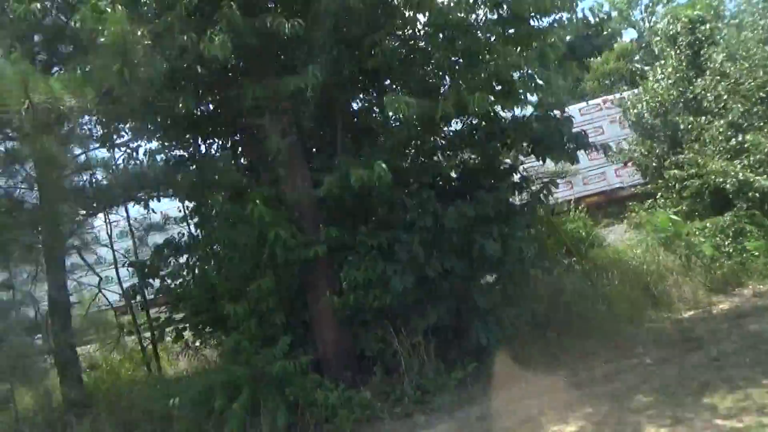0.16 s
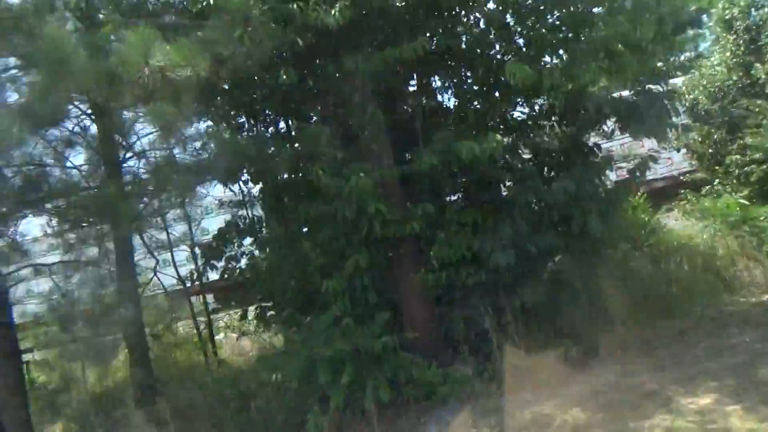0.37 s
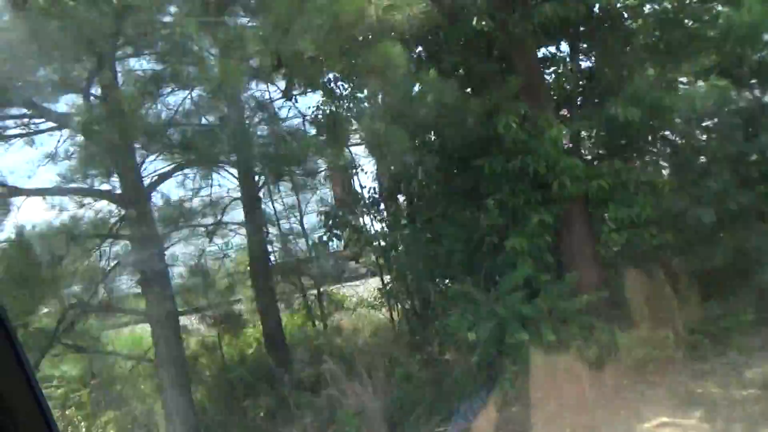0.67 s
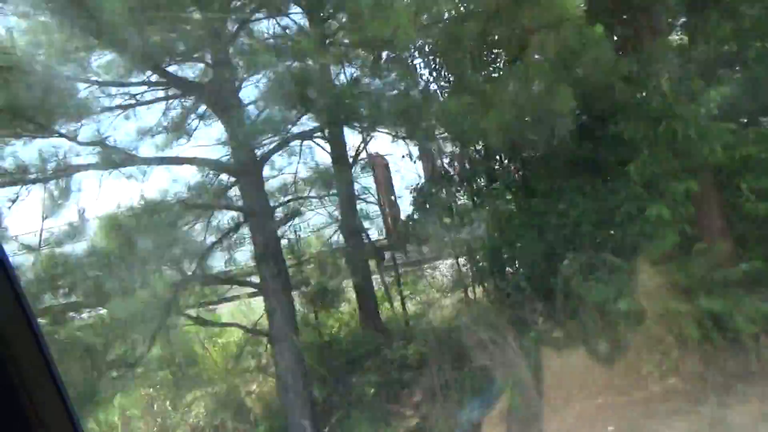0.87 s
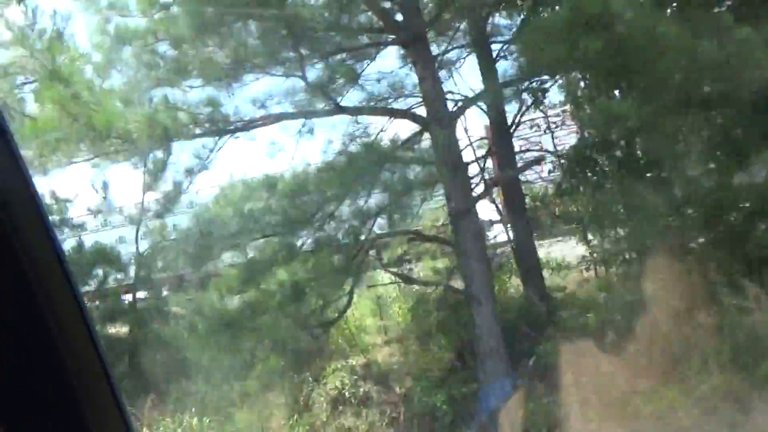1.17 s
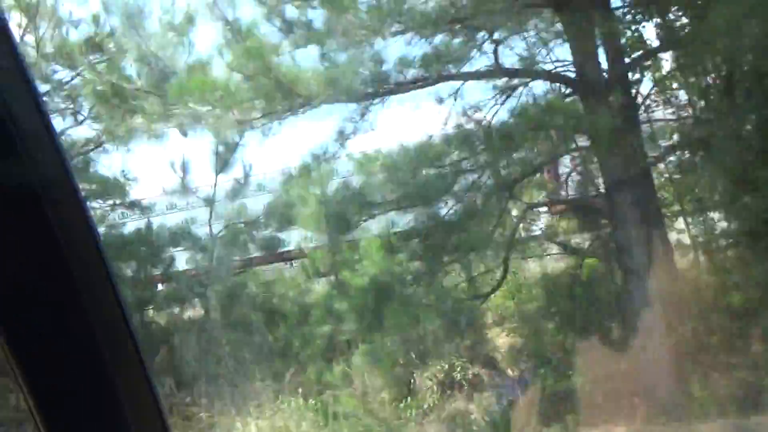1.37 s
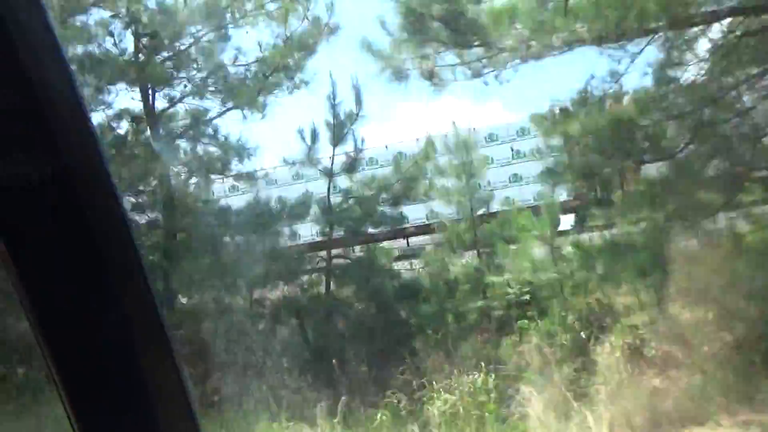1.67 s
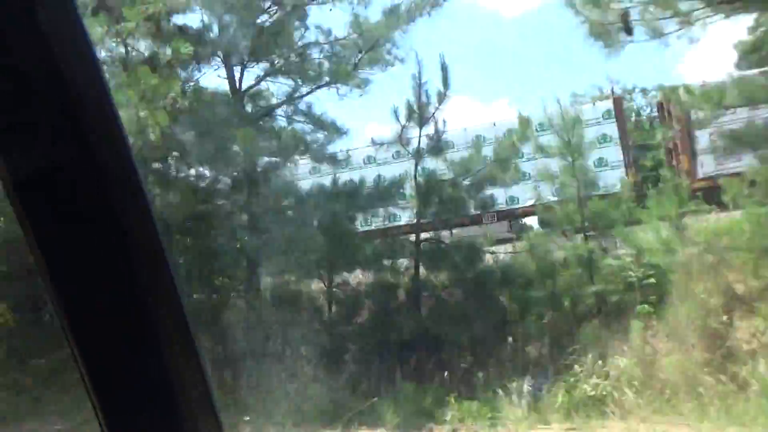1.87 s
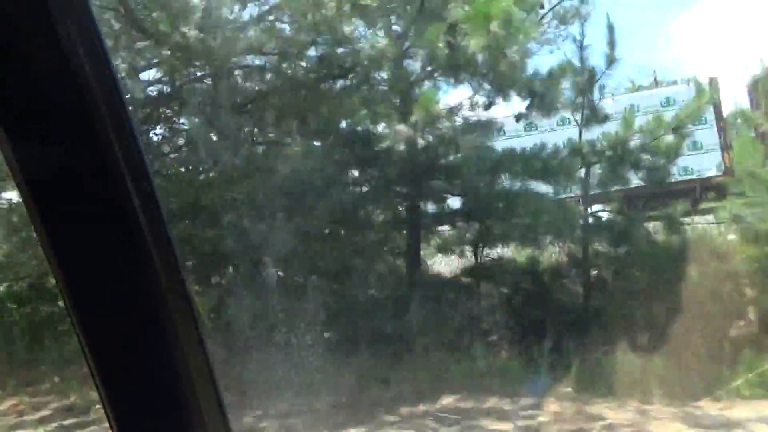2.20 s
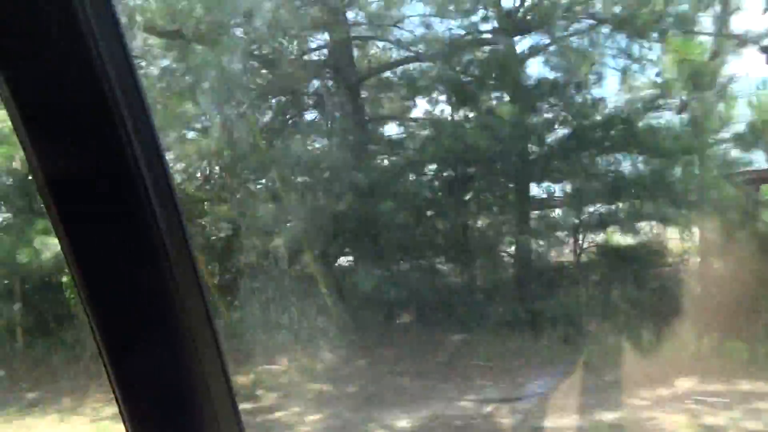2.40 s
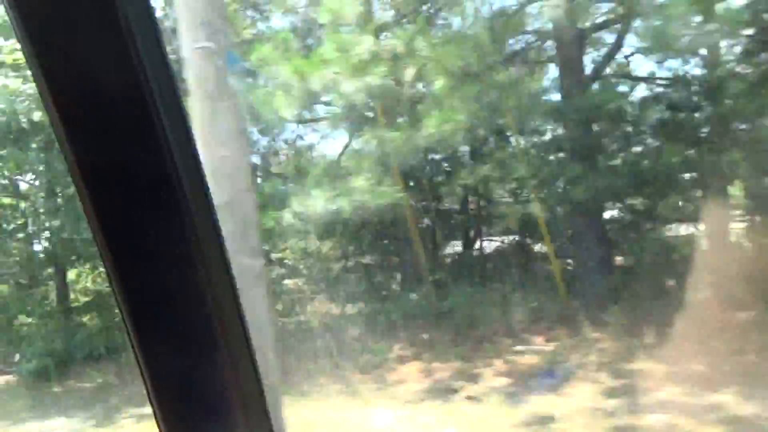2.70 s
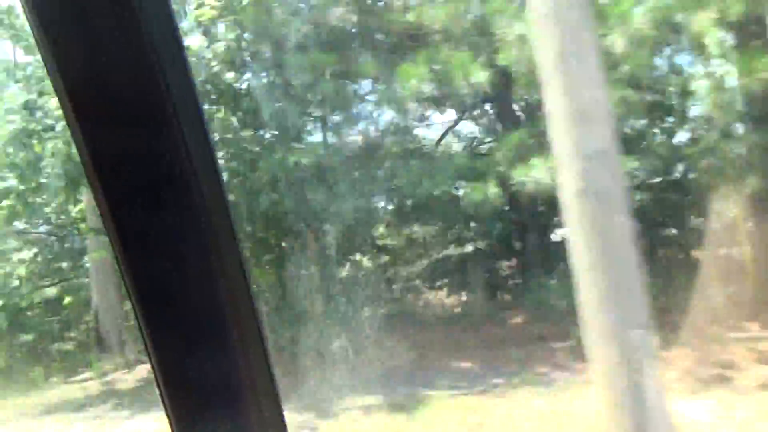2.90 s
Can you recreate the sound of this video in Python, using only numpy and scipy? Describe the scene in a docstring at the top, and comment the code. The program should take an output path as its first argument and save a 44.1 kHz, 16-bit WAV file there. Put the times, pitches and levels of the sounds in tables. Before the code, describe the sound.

Inside a moving car, close cabin microphones catch a low engine drone climbing throughout. Airy rush with brief squeaky whistles peaks early and dies away; a gearbox whine rises alongside, then sags and fades near the end.

```python
"""A booming engine note climbs inside a car: gliding firing orders, each weighted by the cabin resonances.
A gearbox hum of three tones climbs beside it, then sags and fades near the end.
Below lies road noise with one deep shudder; a coarse rush and an airy hiss, both shaped noise,
swell in the first half and die away. Narrow noise bursts make faint whistles and trim ticks."""
import sys
import numpy as np
from scipy import signal
from scipy.fft import rfft, irfft, next_fast_len
from scipy.io import wavfile
from scipy.ndimage import map_coordinates

SR = 44100
rng = np.random.default_rng(int(sys.argv[2]) if len(sys.argv) > 2 else 0)


def transcribe(u):
    """Save the signal u as a 16-bit wav file named by the first command-line argument.

    u: samples, shape (n,) or (channels, n), limited to [-1, 1]; the rate is SR.
    q: integer samples, one column per channel.
    """
    v = np.clip(np.atleast_2d(u).T, -1, 1)
    q = np.round(v * 32767).astype(np.int16)
    wavfile.write(sys.argv[1], SR, q)


N = 134505

# steady road noise colour: (frequency [Hz], relative density [dB])
ROAD_COLOUR = [(20, -6.5), (35, -5), (55, -7.5), (76, 3.5), (120, -1.5), (190, -4), (240, 1), (315, -9),
               (360, -6), (415, -10), (520, -9), (610, -20), (900, -16.5), (1300, -29.5), (1550, -24),
               (1800, -32), (2250, -28), (2700, -35), (3500, -40.5), (5500, -43.5), (6700, -55),
               (10000, -60.5), (15500, -63)]
ROAD_DB = -27
# body shudder over a rough patch of road
SHUDDER_PEAK_S, SHUDDER_HALF_S = 1.3, 0.32
SHUDDER_HZ, SHUDDER_WIDTH_HZ, SHUDDER_DB = 34, 16, -38

# coarse rush level: (time [s], level [dB])
RUSH_LEVEL = [(0, -37.5), (.13, -34.5), (.27, -29), (.6, -27.5), (.95, -27.5), (1.3, -29.5), (1.5, -34.5),
              (1.8, -42.5), (3.05, -48.5)]
# coarse rush colour: (frequency [Hz], relative density [dB])
RUSH_COLOUR = [(90, -13.5), (140, -1), (240, 1.5), (340, -2), (405, -2), (460, 2), (560, 2.5), (640, -6),
               (780, -1.5), (920, -1.5), (1150, -3.5), (1300, -10.5), (1550, -9), (1780, -16.5),
               (2250, -11), (2700, -25.5), (3100, -20.5), (4000, -26), (8000, -52.5)]
RUSH_FLUTTER_DB = 1

# hiss level before HISS_OFFSET_DB: (time [s], level [dB])
HISS_LEVEL = [(0.0, -46), (0.02, -48.5), (0.43, -38.5), (1.11, -44.5), (1.29, -38), (1.3, -44),
              (1.34, -37.5), (1.45, -43.5), (1.83, -56), (2.26, -58), (2.37, -53), (2.61, -59),
              (2.66, -55.5), (2.7, -57.5), (3.0, -60.5)]
# hiss colour: (frequency [Hz], relative density [dB])
HISS_COLOUR = [(1500, -25), (2800, -2), (4500, 2.5), (5300, 3), (6200, 2.5), (6750, -4), (7700, 1.5),
               (10000, 1.5), (12500, 0), (14300, -4.5), (15700, -10.5)]
HISS_OFFSET_DB, HISS_FLUTTER_DB = 1.5, 0.87
# airy whistles and squeaks: (peak time [s], half length [s], pitch [Hz], width [Hz], level [dB])
WHISTLES = [(0.074, 0.19, 3055, 110, -50), (0.256, .06, 820, 160, -34), (.29, .04, 1500, 110, -39.5),
            (0.43, 0.44, 5920, 220.4, -46), (0.833, 0.25, 2930, 200, -46.5), (1.17, .08, 1470, 151, -35),
            (1.269, 0.038, 1502, 110, -31), (1.387, 0.15, 1527, 150, -37.5), (1.27, 0.13, 12350, 600, -46),
            (1.353, 0.11, 9000, 400, -46.5), (1.429, 0.11, 3380, 120, -47.5),
            (1.675, 0.017, 2060, 130, -42.5)]

# trim ticks: (onset [s], pitch [Hz], width [Hz], level [dB])
TICKS = [(1.99, 4509, 2995, -49), (2.645, 11000, 4976, -54), (2.924, 5576, 140, -50.5)]
TICK_RISE_S = 0.0082

# gearbox hum pitch: (time [s], pitch [Hz])
SHAFT_HZ = [(0, 139.5), (.25, 147.5), (.55, 159), (.8, 169.5), (1, 180), (1.25, 189.5), (1.5, 199.5),
            (1.77, 210), (2.1, 225), (2.3, 228.5), (2.43, 226), (2.55, 208)]
# hum: (time [s], level [dB])
HUM_LEVEL = [(0, -62), (.5, -46), (.75, -32), (1.15, -22.5), (1.35, -28), (1.9, -34.5), (2.15, -24),
             (2.45, -27), (2.65, -74)]
# octave of the hum: (time [s], level [dB])
HUM_OCTAVE_LEVEL = [(0, -24), (.2, -23.5), (.35, -35.5), (.53, -35.5), (.68, -42), (.87, -27),
                    (1.15, -32.5), (1.45, -25.5), (1.72, -29), (1.95, -55)]
# third gearbox tone, at 7/6 of the hum pitch: (time [s], level [dB])
UPPER_TONE_LEVEL = [(0, -62), (0.949, -35.5), (1.2, -28), (1.45, -25.5), (1.65, -31.5), (1.9, -27.5),
                    (2.1, -57)]
UPPER_TONE_RATIO = 7 / 6

# engine firing rate: (time [s], rate [Hz])
FIRING_HZ = [(0.0, 63.3), (0.07, 63.32), (0.31, 67.7), (0.38, 68.48), (0.74, 73.74), (1.13, 77.34),
             (1.51, 84.35), (1.95, 92.4), (2.22, 98.4), (2.94, 110.3), (3.05, 112)]
# engine orders: (multiple of firing rate [1], relative level [dB])
ORDERS = [(1, 1), (2, 2.5), (3, -0.5), (4, -5), (5, -5.5), (6, -5.5), (7, -6), (8, -11)]
# booms and dead spots of the cabin: (frequency [Hz], gain [dB])
CABIN_GAIN = [(55, -22), (68, -21.5), (75, -15), (79, -14), (82, -12.5), (108, -11.5), (114, -13),
              (127, -18.5), (135, -15.5), (145, -15), (159, -33.5), (168, -28.5), (181, -27.5), (189, -22),
              (197, -23), (213, -20), (222, -22), (242, -19), (248, -26), (262, -22.5), (282, -26),
              (305, -37.5), (324, -31.5), (345, -40), (365, -33), (405, -42.5), (440, -30.5), (475, -30),
              (536, -29), (554, -49), (645, -42), (900, -50)]
ENGINE_DB = -1
FLUTTER_FIRST_DB, FLUTTER_PER_ORDER_DB = -0.23, 0.45  # flutter of order 1; added per order above
DISPERSION_RAD = 0.94  # phase smear of each firing pulse, per order

# left-right likeness of all noise: (frequency [Hz], correlation [0-1])
LIKENESS = [(40, 1), (250, 0.88), (500, 0.5), (1000, 0.8), (2000, 0.77), (4000, 0.71), (8000, .9),
            (13000, .98)]
# random patches in all noise: depth, knot spacing in frequency and time
PATCH_DB, PATCH_HZ, PATCH_S = 1.56, 70, .09

# microphone ports, left over right: (frequency [Hz], level difference [dB])
PORT_LEAN = [(60, 2.5), (110, 1), (200, -1), (380, 2), (700, 2.2), (1290, 1), (2380, 3), (4400, 1.9),
             (8120, 0.2), (15000, 0)]
# microphone ports, left lead: (frequency [Hz], phase [rad])
PORT_LEAD = [(35, .4), (70, 0.53), (140, 0.71), (220, 0.83), (430, 1.23), (780, 0.19), (1120, 0.57),
             (1900, 0.044)]
TOP_HZ = 15750


def amp(db):
    """Decibels to gain."""
    return 10 ** (np.asarray(db) / 20)


def unit(x):
    """Scale to rms 1."""
    return x / np.sqrt(np.mean(x ** 2) + 1e-20)


def along(points, hz):
    """Interpolate (Hz, value) points on a log frequency axis."""
    point_hz, values = np.transpose(points)
    return np.interp(np.log(hz + 1), np.log(point_hz + 1), values)


def curve(rows):
    """Interpolate (s, value) points to one value per sample."""
    return np.interp(np.arange(N) / SR, *np.transpose(rows))


def turning(hz):
    """Phase [rad] of a rotation at hz."""
    return 2 * np.pi * np.cumsum(hz) / SR


def wobble(knots_per_s):
    """Smooth random curve through random knots."""
    return map_coordinates(rng.standard_normal(2048), [np.arange(N) * knots_per_s / SR], mode="wrap")


def filtered(x, response):
    """Apply a frequency response, zero-padded against wrap-around."""
    m = next_fast_len(N + SR // 2)
    return irfft(rfft(x, m) * response(np.fft.rfftfreq(m, 1 / SR)), m)[..., :N]


def noise(gain):
    """Stereo noise of rms 1: patchy in time and frequency, shaped by gain, correlated by LIKENESS."""
    bin_hz, frame_s, spectra = signal.stft(rng.standard_normal((2, N)), SR, nperseg=1024)
    hz, t = np.meshgrid(bin_hz, frame_s, indexing="ij")
    patches = map_coordinates(rng.standard_normal((512, 128)), [hz / PATCH_HZ, t / PATCH_S], mode="wrap")
    pair = signal.istft(spectra * amp(PATCH_DB * patches), nperseg=1024)[1][:, :N]

    def mid_side_gain(hz):
        angle = np.arccos(np.clip(along(LIKENESS, hz), -1, 1)) / 2
        return gain(hz) * np.array([np.cos(angle), np.sin(angle)])

    mid, side = filtered(pair, mid_side_gain)
    return unit(np.array([mid + side, mid - side]))


def coloured(spectrum):
    """Noise with a (Hz, dB) colour."""
    return noise(lambda hz: amp(along(spectrum, hz)))


def narrow(centre_hz, width_hz):
    """Noise in one resonance."""
    return noise(lambda hz: 1 / (1 + ((hz - centre_hz) / width_hz * np.sqrt(2)) ** 2))


def tone(hz, db, shift_rad=0):
    """Gliding sine at an rms level."""
    return np.sqrt(2) * amp(db) * np.cos(turning(hz) + shift_rad)


def road(bumps_db=0.9):
    """Tyre roar through the body, slightly uneven, plus one deep resonant shudder."""
    roar = amp(ROAD_DB + bumps_db * wobble(14)) * coloured(ROAD_COLOUR)
    swell = np.exp(-((np.arange(N) / SR - SHUDDER_PEAK_S) / SHUDDER_HALF_S) ** 2)
    shudder = amp(SHUDDER_DB) * swell * narrow(SHUDDER_HZ, SHUDDER_WIDTH_HZ)
    return roar + shudder


def rush(throb_depth=0.12):
    """Coarse, fluttering rush of air whose amplitude throbs at the firing rate."""
    throb = 1 + throb_depth * np.cos(turning(curve(FIRING_HZ)))
    flutter = amp(RUSH_FLUTTER_DB * wobble(260))
    return amp(curve(RUSH_LEVEL)) * unit(throb * flutter * coloured(RUSH_COLOUR))


def hiss(waver_db=1):
    """Fine hiss, with narrow whistling resonances that come and go."""
    t = np.arange(N) / SR
    level_db = HISS_OFFSET_DB + curve(HISS_LEVEL) + HISS_FLUTTER_DB * wobble(110)
    out = amp(level_db) * coloured(HISS_COLOUR)
    for peak_s, half_s, hz, width_hz, db in WHISTLES:
        swell = np.exp(-((t - peak_s) / half_s) ** 2)
        out = out + amp(db + waver_db * wobble(24.58)) * swell * narrow(hz, width_hz)
    return out


def trim():
    """Soft ticks of the cabin trim: band noise that rises briefly and decays."""
    out = 0
    for onset_s, hz, width_hz, db in TICKS:
        u = np.maximum(np.arange(N) / SR - onset_s, 0) / TICK_RISE_S
        envelope = u * np.exp(1 - u)  # peak 1 at u = 1
        out = out + amp(db) * envelope * narrow(hz, width_hz)
    return out


def gearbox(flutter_db=0.7):
    """Three wavering tones at fixed ratios to the gearbox shaft's hum pitch."""
    hz = curve(SHAFT_HZ)
    parts = [(1, HUM_LEVEL), (2, HUM_OCTAVE_LEVEL), (UPPER_TONE_RATIO, UPPER_TONE_LEVEL)]
    return sum(tone(ratio * hz, curve(level) + flutter_db * wobble(14)) for ratio, level in parts)


def engine():
    """Firing orders that swell and fade as they climb through the cabin's resonances."""
    firing_hz, out = curve(FIRING_HZ), 0
    for order, order_db in ORDERS:
        hz = order * firing_hz
        flutter_db = (FLUTTER_FIRST_DB + FLUTTER_PER_ORDER_DB * (order - 1)) * wobble(24.95)
        level_db = ENGINE_DB + order_db + along(CABIN_GAIN, hz) + flutter_db
        shift_rad = DISPERSION_RAD * order * (order - 1) / 2
        out = out + tone(hz, level_db, shift_rad)
    return out


def scene():
    """Sum of all sources in the cabin."""
    return road() + rush() + hiss() + trim() + gearbox() + engine()


def record(dry):
    """Two microphone ports: level and phase differ with frequency, the left leads; cut off at TOP_HZ."""
    sides = np.array([[.5], [-.5]])  # left, right: half the difference each

    def ports(hz):
        gain = amp(sides * along(PORT_LEAN, hz))
        phase = np.exp(1j * sides * along(PORT_LEAD, hz))
        return gain * phase * (hz < TOP_HZ)

    return filtered(dry, ports)


dry = scene()
out = record(dry)
transcribe(out)
```